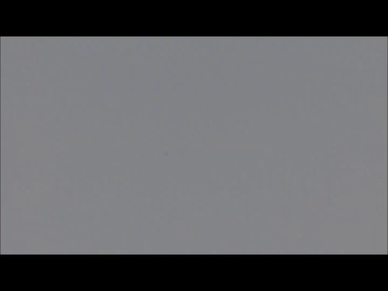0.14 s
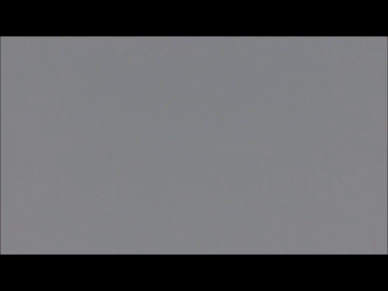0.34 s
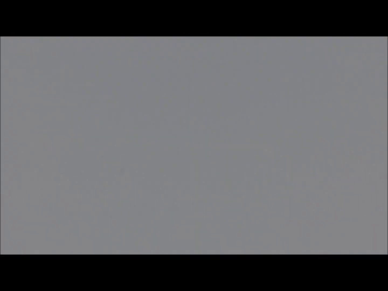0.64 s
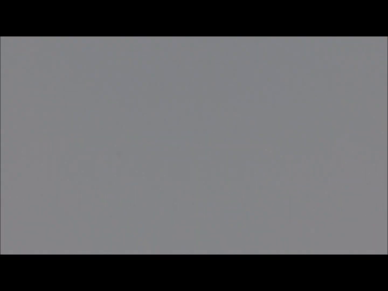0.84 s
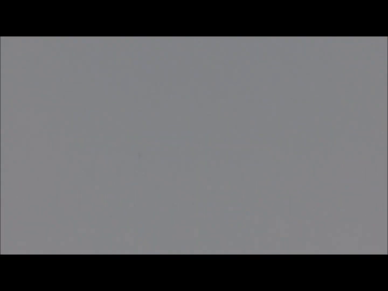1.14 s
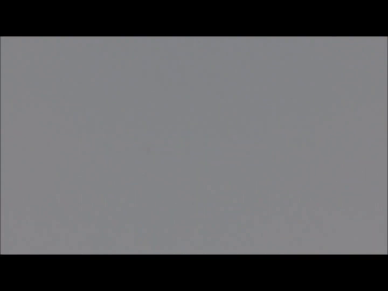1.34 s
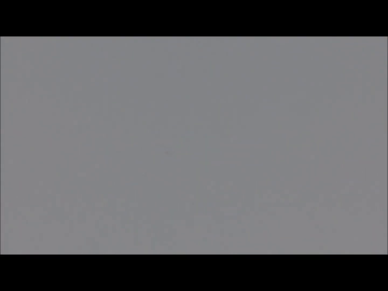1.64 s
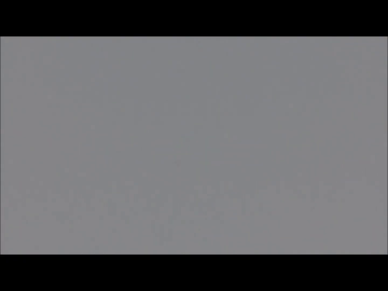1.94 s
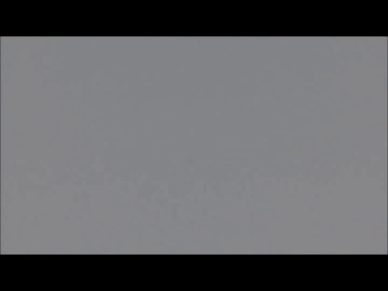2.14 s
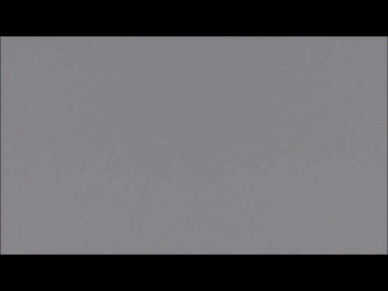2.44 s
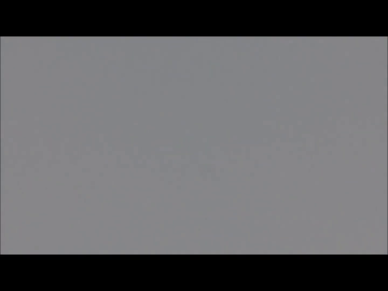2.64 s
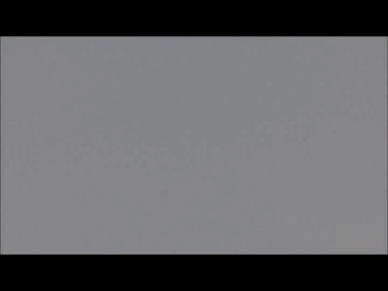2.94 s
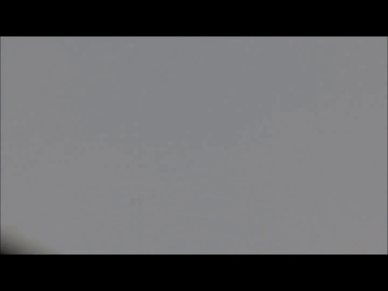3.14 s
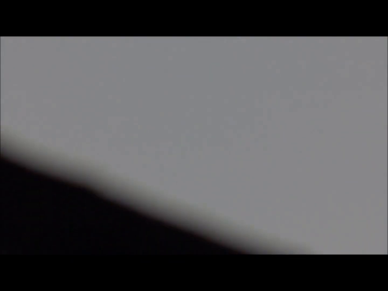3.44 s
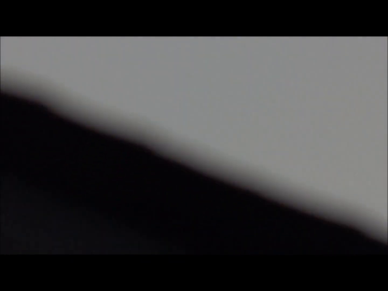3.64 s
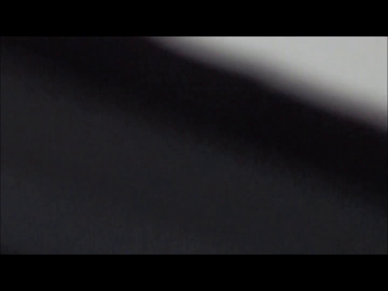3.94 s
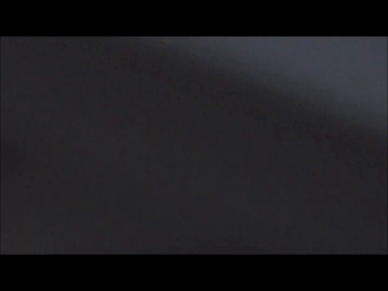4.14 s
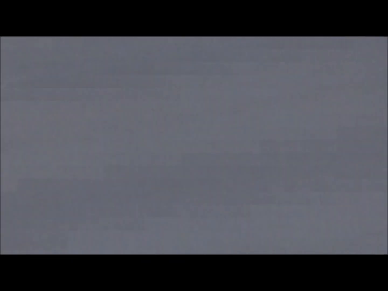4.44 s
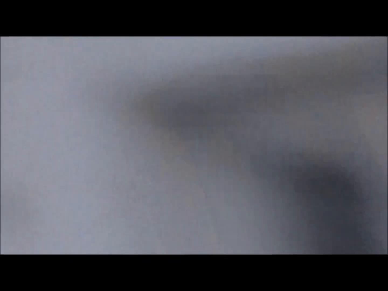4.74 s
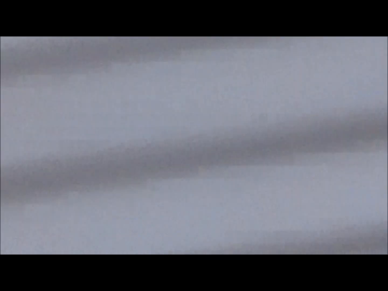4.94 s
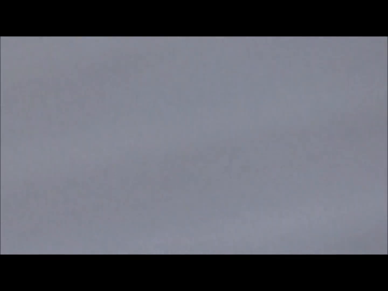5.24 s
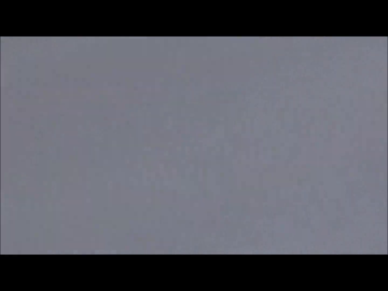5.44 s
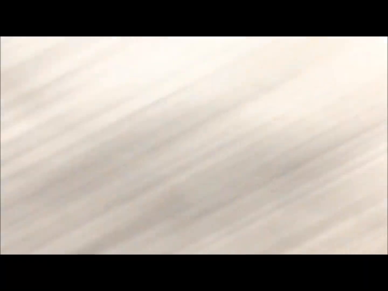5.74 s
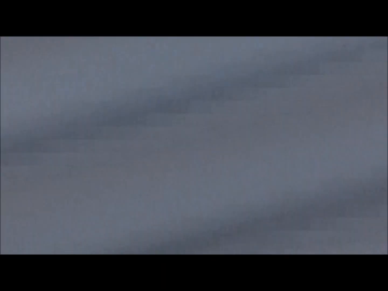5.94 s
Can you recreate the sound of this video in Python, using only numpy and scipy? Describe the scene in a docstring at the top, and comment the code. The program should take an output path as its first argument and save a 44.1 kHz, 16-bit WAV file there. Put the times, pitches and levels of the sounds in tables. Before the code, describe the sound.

A heavy engine drones loudly, dips then climbs in pitch, cuts off abruptly amid sharp plastic clicks and rubbing, and softly returns over street noise.

```python
"""A heavy vehicle's drone dips in pitch, climbs as it pulls away along a street, then shuts off for
a gear change and returns softly. Nearby, hands click and rub a hard case, over traffic noise and thin hiss.
The drone is a set of sine tones at multiples of the engine's firing rate, swelling and fading.
Traffic is shaped noise with faint low tones; clicks and rubs set small resonances ringing."""
import sys
import numpy as np
from scipy import signal
from scipy.fft import next_fast_len
from scipy.io import wavfile
from scipy.ndimage import uniform_filter1d

SR = 44100
rng = np.random.default_rng(int(sys.argv[2]) if len(sys.argv) > 2 else 0)


def materialize(psi):
    """Save the field psi as 16-bit PCM at rate SR to the path in sys.argv[1].

    A 1-D psi becomes a single channel; in a 2-D psi each row is a channel.
    """
    bounded = np.clip(np.atleast_2d(psi).T, -1, 1)
    quanta = np.round(bounded * 32767).astype(np.int16)
    wavfile.write(sys.argv[1], SR, quanta)


N = 267863
TIME = np.arange(N) / SR

# low modes of the case: (multiple of the thud pitch, level [dB], time to fall 60 dB [s])
THUD_MODES = [(1, -4.5, 0.016), (1.45, -11, 0.012), (1.82, -9.5, .011)]
# fingers rubbing on the case; each fade lasts at least 0.02 s:
# (start [s], loudest [s], end [s], hiss [dB], swish [dB], ringing [dB], judder [dB])
RUBS = [(4.052, 4.087, 4.06, -31, -40, -53, -32), (4.134, 4.187, 4.3, -41, -47, -45, -35.5),
        (4.204, 4.297, 4.365, -47, -48, -43, -43), (4.54, 4.615, 4.68, -50, -49, -64, -44),
        (4.68, 4.738, 4.785, -47, -48, -51, -56), (4.842, 4.972, 5.04, -39.5, -40, -46, -42.5),
        (5.27, 5.334, 5.37, -41, -49, -48, -53), (5.473, 5.491, 5.52, -40, -40, -48, -40),
        (5.603, 5.64, 5.69, -41, -44, -52, -53), (5.693, 5.932, 6.26, -40.5, -50, -56, -64)]
JUDDER_HZ = 640   # lowest mode shaken by a rub


def from_db(db):
    """Turn decibels into a gain."""
    return 10 ** (np.asarray(db) / 20)


def rms_one(x):
    """Scale to an average power of 1."""
    return x / np.sqrt(np.mean(x ** 2) + 1e-20)


def in_time(rows):
    """Draw straight lines between the rows, giving each column a value at every sample."""
    times, *columns = np.transpose(rows)
    return [np.interp(TIME, times, column) for column in columns]


def at_hz(points, hz):
    """Read a curve at one frequency, on a log-frequency axis."""
    point_hz, values = np.array(points).T
    return np.interp(np.log(hz), np.log(point_hz), values)


def pan(lean_db):
    """Left and right gains for a given left-minus-right difference."""
    return from_db(np.array([[.5], [-.5]]) * lean_db)


def drift(rate):
    """Smooth random wandering of spread 1; a higher rate [Hz] wanders faster."""
    step = 40   # samples between computed points
    r = np.exp(-2 * np.pi * rate * step / SR)
    steps = rng.standard_normal(N // step + 2002)
    slow = signal.lfilter([1], [1, -2 * r, r * r], steps)[2000:]   # skip the filter's start
    return np.interp(np.arange(N) / step, np.arange(len(slow)), rms_one(slow))


def band_pass(x, low_hz, high_hz, order):
    """Keep the sound between two frequencies."""
    return signal.sosfilt(signal.butter(order, [low_hz, high_hz], "band", fs=SR, output="sos"), x)


def octave_band(x, hz):
    """A gentle band-pass, one octave wide unless its top is held below the filter's limit."""
    return band_pass(x, hz / np.sqrt(2), min(hz * np.sqrt(2), .45 * SR), order=1)


def ring(force, hz, t60):
    """One resonance: a unit click starts a dying sine of height 1."""
    r = from_db(-60 / (t60 * SR))
    w = 2 * np.pi * hz / SR
    return signal.lfilter([0, np.sin(w)], [1, -2 * r * np.cos(w), r * r], force + 1e-18)


def resonate(force, modes):
    """One force drives several resonances, neighbours in opposite phase."""
    out = 0
    for k, (hz, db, t60) in enumerate(modes):
        out = out + from_db(db) * ring(force, hz, t60) * (-1) ** k
    return out


def pitched(modes, hz):
    """Turn multiples of a pitch into frequencies."""
    return [(ratio * hz, db, t60) for ratio, db, t60 in modes]


def street_noise(spectrum, patchy_db):
    """Third-octave bands of stereo noise, each with its own level, flicker, width and lean; rms 1."""
    # how alike left and right are: (frequency [Hz], correlation)
    likeness = [(60, 1), (150, 1), (300, 0.84), (600, 0.49), (1100, 0.55), (2200, 0.7), (5000, 0.75),
                (9000, 0.82), (13000, 1)]
    # how the noise leans to one side: (frequency [Hz], left minus right [dB])
    side_lean = [(60, -1.5), (250, -0.5), (600, -1.5), (1100, -3), (2200, -2), (5000, -4.5), (9000, -0.5)]
    out = 0
    edges = 20 * 2 ** (np.arange(30) / 3)
    white = rng.standard_normal((2, 2, N))   # neighbouring bands use different noise
    for k, (low, high) in enumerate(zip(edges, edges[1:])):
        hz = np.sqrt(low * high)
        if spectrum[0][0] <= hz <= spectrum[-1][0]:
            mid, side = band_pass(white[k % 2], low, high, order=2)
            alike = np.clip(at_hz(likeness, hz), 0, 1)
            stereo = np.sqrt(1 + alike) * mid + np.sqrt(1 - alike) * side * [[1], [-1]]
            level = from_db(at_hz(spectrum, hz) + patchy_db * drift(11.4))
            out = out + level * pan(at_hz(side_lean, hz)) * stereo
    return rms_one(out)


def hum(start, end, first_hz, last_hz, level_db):
    """A distant engine: one wavering low tone that slides as it swells and fades."""
    progress = np.clip((TIME - start) / (end - start), 0, 1)
    hz = first_hz + (last_hz - first_hz) * progress
    phase = 2 * np.pi * np.cumsum(hz) / SR + .5 * drift(10.4)
    swell = np.sin(np.pi * progress)
    return np.sqrt(2) * from_db(level_db + 0.81 * drift(2.4)) * swell * np.sin(phase)


def block_clatter():
    """Dense mechanical noise ringing in the engine block; rms 1."""
    # ringing of the block: (centre [Hz], width [Hz], relative level [dB])
    block = [(750, 84, 9), (1640, 250, 5.5), (2990, 740, -5.5), (4480, 410, -8.5)]
    noise = rng.standard_normal(N) + 0.5 * rng.standard_normal((2, N))
    out = 0
    for hz, width, db in block:
        out = out + from_db(db) * band_pass(noise, hz - width / 2, hz + width / 2, order=2)
    return rms_one(out)


def traffic(turn, throttle_db):
    """Rumble rises with the throttle; road roar, tyre hiss and clatter throb a little with the engine."""
    # noise spectra: (frequency [Hz], relative level [dB per Hz])
    rumble_spectrum = [(20, -19.5), (32, -10), (45, -5.5), (58, -6.5), (78, 2.5), (110, 2), (150, 4.5),
                       (190, 1.5), (250, -7), (400, -9), (520, -16.5), (800, -26)]
    roar_spectrum = [(300, -17.5), (450, 2.5), (580, -4.5), (760, 2), (1050, 3.5), (1330, -6), (1650, -1),
                     (2200, -12.5), (2800, -22.5), (4000, -40)]
    hiss_spectrum = [(1800, 1.5), (2500, 9), (3100, 0), (3900, -1), (4600, -5.5), (5400, -7), (6500, -10.5),
                     (8000, -15), (10500, -21.5), (14500, -25), (16000, -36)]
    # noise from the road: (time [s], roar level [dB], tyre hiss level [dB])
    road = [(0, -35, -47), (.4, -34.5, -46.5), (1.2, -32.5, -42), (2.5, -33, -43.5), (3.2, -30.5, -43),
            (4.07, -32, -41.5), (4.4, -39, -47.5), (4.8, -38.5, -47.5), (5.15, -40, -47.5),
            (5.5, -36.5, -45.5), (6.07, -37.5, -47)]
    # level of the engine's clatter before its throb: (time [s], level [dB])
    clatter_level = [(0, -48), (2.6, -44.5), (3.1, -38.5), (3.6, -33.5), (4.07, -37.5), (4.2, -59.5),
                     (6.07, -43)]
    # low tones of traffic further off:
    # (start [s], end [s], first pitch [Hz], last pitch [Hz], level at the top of the swell [dB])
    far_engines = [(4.204, 4.596, 78.5, 78, -32.5), (4.792, 5.497, 74.5, 62.5, -33),
                   (5.104, 6.5, 186.8, 187.2, -30), (5.297, 6.12, 121, 110, -28)]
    rumble_db = -25.5 + 0.18 * throttle_db   # follows a small share of the throttle's swing
    roar_db, hiss_db = in_time(road)
    clatter_db, = in_time(clatter_level)
    throb = 1 + 0.034 * np.cos(turn) + 0.045 * np.cos(turn / 2)
    rumble = from_db(rumble_db) * street_noise(rumble_spectrum, patchy_db=2.0)
    roar = from_db(roar_db) * street_noise(roar_spectrum, patchy_db=1.3)
    hiss = from_db(hiss_db) * street_noise(hiss_spectrum, patchy_db=1.5)
    clatter = from_db(clatter_db) * block_clatter() * pan(lean_db=-1.5)
    far_hums = sum(hum(*row) for row in far_engines)
    return rumble + throb * (roar + hiss + clatter) + far_hums


def gliding_hiss(half_width_hz):
    """A narrow band of noise around zero frequency is shifted up to a sliding centre."""
    # the thin hiss: (time [s], centre [Hz], level [dB])
    glide = [(0, 6500, -66), (.75, 6500, -63), (.9, 8560, -71), (1.25, 8400, -67), (1.45, 7350, -60),
             (1.7, 6540, -60.5), (4.1, 6360, -70), (4.3, 6570, -80), (5.7, 5900, -74), (5.79, 5950, -53),
             (5.97, 6700, -55)]
    centre_hz, level_db = in_time(glide)
    noise = rng.standard_normal(N) + 1j * rng.standard_normal(N)
    narrow = signal.sosfilt(signal.butter(2, half_width_hz, fs=SR, output="sos"), noise)
    carrier = np.exp(2j * np.pi * np.cumsum(centre_hz) / SR)
    return from_db(level_db) * rms_one(np.real(narrow * carrier))


def pressure(start, top, end):
    """A finger presses harder, then lets go; 0 to 1."""
    return np.interp(TIME, [start, top, max(end, top + .02)], [0, 1, 0]) ** .8


def rubbed(modes, slips_per_s):
    """Random tiny slips keep a set of modes ringing; rms 1."""
    slips = (rng.random(N) < slips_per_s / SR) * rng.standard_normal(N)
    return rms_one(resonate(slips, modes))


def finger_rubs(grain_db):
    """Skin drags over plastic: a gritty hiss and swish, while small slips ring the surface and low modes."""
    # hiss of the skin: (frequency [Hz], relative level [dB per Hz])
    rub_spectrum = [(1200, 21), (2600, 10), (4200, -2), (6000, -3.5), (7200, 0), (8800, -3), (11000, -12),
                    (14000, -21), (16000, -26)]
    # fine ringing of the rubbed surface: (pitch [Hz], level [dB], time to fall 60 dB [s])
    surface_modes = [(2900, -4, .012), (4500, -1, .007), (5540, 1, 0.0052), (6300, -11, .008),
                     (8000, -2.5, .008), (9100, -2, 0.0088), (12800, -18, .006)]
    grip = from_db(grain_db * drift(270))
    hiss = rms_one(street_noise(rub_spectrum, patchy_db=2.5) * grip)
    swish = rms_one(octave_band(rng.standard_normal(N) * grip, hz=2700))
    shared_ringing = rubbed(surface_modes, slips_per_s=1800)
    side_ringing = np.array([rubbed(surface_modes, slips_per_s=1000) for ear in range(2)])
    ringing = rms_one(grip * (shared_ringing + .8 * side_ringing))
    judder = rubbed(pitched(THUD_MODES, JUDDER_HZ), slips_per_s=820) * pan(lean_db=-4.0)
    gains = 0
    for start, top, end, *levels_db in RUBS:
        gains = gains + np.outer(from_db(levels_db), pressure(start, top, end))
    return sum(gain * layer for gain, layer in zip(gains, (hiss, swish, ringing, judder)))


def faint_ticks():
    """A rubbing finger catches at random, most often where it presses hardest; rows like the clicks."""
    # one tick, its levels relative to the rub's judder:
    # (thud [dB], knock [dB], snap [dB], knock pitch [Hz], snap centre [Hz])
    tick = (-7, -0.5, 9.5, 2602, 8502)
    thud_db, knock_db, snap_db, knock_hz, snap_hz = tick
    ticks_per_s, spread_db = 65, 4   # rate at full pressure; spread of the levels
    rows = []
    for start, top, end, *_, judder_db in RUBS:
        catches = rng.random(N) < pressure(start, top, end) * ticks_per_s / SR
        size_db = judder_db + spread_db * rng.standard_normal(N)
        for s, db in zip(TIME[catches], size_db[catches]):
            rows.append((s, thud_db + db, knock_db + db, snap_db + db, JUDDER_HZ, knock_hz, snap_hz))
    return rows


def case_clicks(crunch_s, crunch, size=4096):
    """Each slip of the case is a sharp push and a brief crunch into its low, middle and high modes."""
    # clicks of the case:
    # (time [s], thud [dB], knock [dB], snap [dB], thud pitch [Hz], knock pitch [Hz], snap centre [Hz])
    clicks = [(4.054, -45, -40, -24, 600, 2400, 9000), (4.0757, -25, -12, -10, 600, 2520, 9000),
              (4.0815, -40, -30, -17, 600, 2400, 8500), (4.0988, -10, 1.5, 1, 612, 2090, 5400),
              (4.1, -45, -35, -7, 600, 2500, 13000), (4.11, -49, -38, -1.5, 600, 3450, 9000),
              (4.139, -36, -13, -25, 600, 2160, 5000), (4.1497, -35, -38, -30, 600, 2400, 9000),
              (4.163, -20, -20, -16.5, 620, 2000, 8500), (4.168, -30, -25, -26, 600, 2980, 4000),
              (4.19, -13, -17, -15.5, 595, 1900, 8500), (4.2038, -10.5, -9.5, -30, 614, 1600, 7000),
              (4.208, -13, -24, -32, 664, 1900, 7000), (4.2267, -17, -26, -22, 610, 2360, 7000),
              (4.261, -32, -38, -21, 586, 2400, 7000), (4.436, -36, -11, -17.5, 600, 2170, 9000),
              (4.555, -45, -25, -22.5, 614, 1780, 9500), (4.5647, -10.5, -6, -28, 607, 1670, 3000),
              (4.6043, -20, -24, -26, 700, 1800, 7000), (4.6524, -28, -10.5, -15.5, 900, 2340, 4170),
              (5.2615, -26, -10, -13, 640, 2060, 6100), (5.2805, -39, -25, -24, 900, 2500, 6360),
              (5.2885, -20.5, -12.5, -3, 860, 2520, 6880), (5.3165, -38, -23, -36, 880, 2700, 5000),
              (5.336, -41, -42, -14.5, 900, 3240, 8000), (5.352, -38, -27, -26, 900, 2800, 4500),
              (5.366, -33, -21, -17, 900, 2300, 6500), (5.4072, -30, -16.5, -14.5, 890, 1750, 9500),
              (5.469, -27, -27, -22, 900, 2400, 5000), (5.4875, -10, -14.5, -20, 890, 2370, 4500),
              (5.597, -16.5, -16.5, -20.5, 860, 2420, 7000), (5.618, -28, -16.5, -28, 904, 2700, 5000),
              (5.726, -25, -9.5, -14.5, 710, 1490, 6800), (5.749, -55, -42, -26, 900, 2500, 10000),
              (5.8215, -45, -39, -15, 900, 2500, 12000), (5.9362, -17, -19, -16.5, 895, 2530, 6960),
              (5.9737, -50, -34, -22, 900, 2530, 9000)]
    # modes around the touched spot: (multiple of the knock pitch, level [dB], time to fall 60 dB [s])
    knock_modes = [(.55, -10, 0.0045), (.76, -4, 0.0041), (1, 0, 0.0038), (1.25, -2, 0.0033),
                   (1.55, -6.5, .003), (1.9, -9.5, 0.0033)]
    # high modes of the case: (pitch [Hz], level [dB], time to fall 60 dB [s])
    snap_modes = [(4150, -7.5, 0.0033), (5780, -10, 0.004), (7350, -8.5, 0.0017), (9000, -9.5, 0.0027),
                  (9820, -8.5, 0.0012), (13300, -11, 0.001)]
    out = np.zeros((2, N + size))
    age = np.arange(size) / SR
    for s, thud_db, knock_db, snap_db, thud_hz, knock_hz, snap_hz in [*clicks, *faint_ticks()]:
        grit = rng.standard_normal(size) + 0.94 * rng.standard_normal((2, size))
        force = (age == 0) + crunch * grit * np.exp(-age / crunch_s)
        thud = from_db(thud_db) * resonate(force, pitched(THUD_MODES, thud_hz))
        knock = from_db(knock_db) * resonate(force, pitched(knock_modes, knock_hz))
        snap = from_db(snap_db) * octave_band(resonate(force, snap_modes), snap_hz)
        at = round(s * SR)
        out[:, at:at + size] += (thud + knock) * pan(lean_db=-2.0) + snap * pan(lean_db=-1.0)
    return signal.sosfilt(signal.butter(2, 400, "high", fs=SR, output="sos"), out[:, :N])


def lift_db(hz):
    """How much the exhaust resonances raise a gliding tone; a quick sweep barely stirs them."""
    # resonances of the exhaust: (centre [Hz], width [Hz], lift of a steady tone [dB])
    response = [(253.2, 7.4, 9.5), (295, 2.9, 5), (337.8, 9.7, 16.5)]
    settle_s = 0.036   # the lift is averaged over this time
    steady_db = sum(db / (1 + (2 * (hz - centre) / width) ** 2) for centre, width, db in response)
    return uniform_filter1d(steady_db, max(1, round(settle_s * SR)))


def engine_order(multiple, firing_hz, turn, fade_db, rough):
    """One weak tone, fading irregularly; whole multiples boom as they cross a resonance."""
    phase = multiple * turn + rng.uniform(0, 2 * np.pi) + rough * drift(6.9)
    boom_db = lift_db(multiple * firing_hz) if multiple % 1 == 0 else 0
    return np.sqrt(2) * from_db(boom_db + fade_db * drift(5.1)) * np.sin(phase)


def exhaust(firing_hz, turn, throttle_db):
    """Firings make two strong tones and a growl, with weaker tones that follow the throttle."""
    # levels before a shared flicker, of the firing tone, its octave
    # and the growl of the lugging engine at 2.5 times the firing rate: (time [s], level [dB])
    tone_level = [(0.0, -20.5), (0.05, -13), (0.09, -26), (0.15, -14.5), (0.27, -27), (0.32, -20),
                  (0.36, -32.5), (0.44, -25), (0.56, -20.5), (0.66, -26), (1.18, -17.5), (1.32, -20.9),
                  (1.38, -29.5), (1.55, -15.5), (1.62, -13.5), (1.75, -25), (1.83, -20.5), (2.1, -11.5),
                  (2.25, -14), (2.33, -27.5), (2.37, -17.5), (2.54, -17.5), (2.65, -10.5), (2.93, -12.5),
                  (3.01, -16.5), (3.07, -13), (3.25, -22), (3.32, -16.7), (3.44, -13), (3.63, -19),
                  (3.97, -12), (4.07, -16), (4.12, -27.8), (4.23, -26), (4.29, -37.5), (5.5, -41.5),
                  (5.7, -28.5), (6.07, -35)]
    octave_level = [(0.0, -32.5), (0.03, -35.5), (0.07, -20), (0.12, -31.5), (0.19, -20), (0.36, -42),
                    (0.43, -32), (0.52, -36), (0.59, -21.5), (0.83, -26), (0.85, -20), (0.88, -36.5),
                    (0.94, -21), (0.99, -14), (1.11, -17), (1.22, -21), (1.85, -12.5), (1.98, -21.5),
                    (2.17, -13), (2.31, -26), (2.44, -16.5), (2.55, -38.5), (2.58, -25), (2.61, -21),
                    (2.69, -31.3), (2.75, -16.5), (2.82, -25.5), (2.92, -16), (3.02, -32.5), (3.09, -13),
                    (3.17, -17.5), (3.29, -11), (3.59, -16.5), (3.79, -9), (4.08, -15), (4.16, -37.5),
                    (5.8, -37.5), (6.07, -23.5)]
    growl_level = [(0, -40.5), (.7, -39), (.85, -25), (1.25, -24.5), (1.45, -34.5), (1.62, -25.5),
                   (2.05, -29.5), (2.25, -43), (3.2, -54), (3.9, -39), (4.2, -57.5), (6.07, -56)]
    # weaker tones, before throttle and fading: (multiple of the firing rate, level [dB])
    overtones = [(3, -40.5), (4, -44), (5, -46.5), (6, -52.5), (7, -57.5), (8, -56.5), (9, -53.5)]
    # half orders, also before the evening-out below: (multiple of the firing rate, level [dB])
    half_orders = [(.5, -54.5), (1.5, -39.5), (3.5, -45.5), (4.5, -51), (5.5, -55.5)]
    tone_db, = in_time(tone_level)
    octave_db, = in_time(octave_level)
    growl_db, = in_time(growl_level)
    tone = from_db(tone_db) * np.cos(turn)
    octave = from_db(octave_db + 0.88 * drift(11)) * np.sin(2 * turn + .5 * drift(0.8))
    growl = from_db(growl_db) * np.cos(2.5 * turn + 0.2 * drift(3.4))
    flicker = from_db(0.01 + 0.42 * drift(24))
    boom = np.sqrt(2) * flicker * (tone + octave + growl)
    # the cylinders even out as the firing rate rises, so the half orders fade: 0.96 dB per Hz
    uneven_db = 0.96 * (93.9 - firing_hz)
    orders = list(overtones) + [(k, db + uneven_db) for k, db in half_orders]
    buzz = sum(from_db(db) * engine_order(k, firing_hz, turn, fade_db=3.0, rough=0.56) for k, db in orders)
    buzz_gain = from_db(0.93 * throttle_db)   # follows most of the throttle's swing
    return (boom + buzz_gain * buzz) * pan(lean_db=-0.9)


def across_ports(x, side_db):
    """The drone comes from one side, so two microphone ports hear it slightly out of phase."""
    quarter_turn = np.imag(signal.hilbert(x, next_fast_len(N))[:, :N])   # every tone shifted by 90 degrees
    return x + from_db(side_db) * quarter_turn * [[1], [-1]]


def scene():
    """The engine in the street, and the hands close by."""
    # engine speed: (time [s], firing rate [Hz])
    speed = [(0, 100.7), (.08, 95.6), (.18, 86.17), (.45, 83.1), (.8, 84.3), (1.6, 91.73), (2, 95.2),
             (2.2, 98), (2.5, 100.2), (3, 103.6), (3.5, 107.3), (4.1, 110.2), (4.35, 104.8), (4.7, 103.8),
             (5.55, 86.4), (6.07, 88.55)]
    # throttle, as exhaust strength relative to hard pulling: (time [s], level [dB])
    throttle = [(0, 3.5), (.18, -1.5), (.36, -6), (.58, -5.5), (.87, -0.5), (1, 0), (1.9, 3), (2.55, -4.5),
                (3, 3.5), (3.3, 2), (3.8, 3.5), (4.085, 3.5), (4.16, -27), (4.7, -28), (5.3, -22.5),
                (5.65, -17.5), (6.07, -3.5)]
    firing_hz, = in_time(speed)
    throttle_db, = in_time(throttle)
    turn = 2 * np.pi * np.cumsum(firing_hz) / SR   # phase of the firing tone [radians]
    background = traffic(turn, throttle_db) + gliding_hiss(half_width_hz=430)
    hands = case_clicks(crunch_s=0.0025, crunch=0.1) + finger_rubs(grain_db=1.5)
    drone = across_ports(exhaust(firing_hz, turn, throttle_db), side_db=-13.5)
    return background + hands + drone


def record(dry):
    """Peaks are clipped at full scale, then a steep filter removes the treble above 16 kHz."""
    limited = np.clip(dry, -1, 1)
    return signal.sosfilt(signal.ellip(10, .1, 90, 16000, fs=SR, output="sos"), limited)


dry = scene()
out = record(dry)
materialize(out)
```